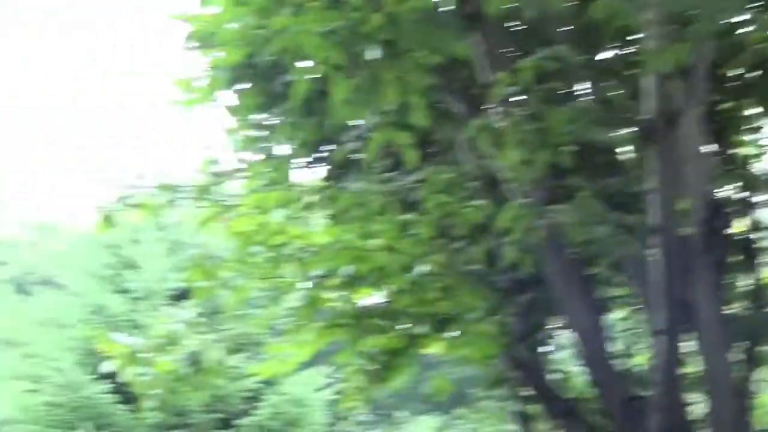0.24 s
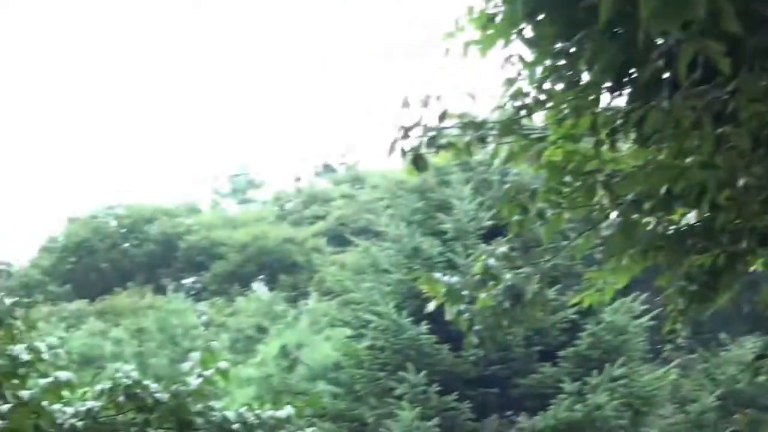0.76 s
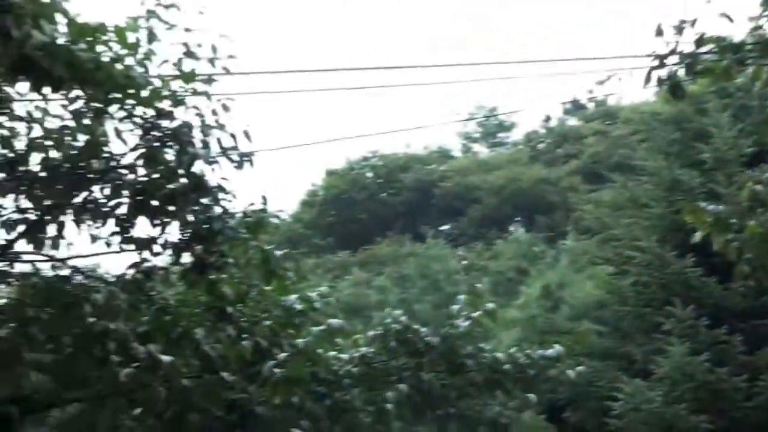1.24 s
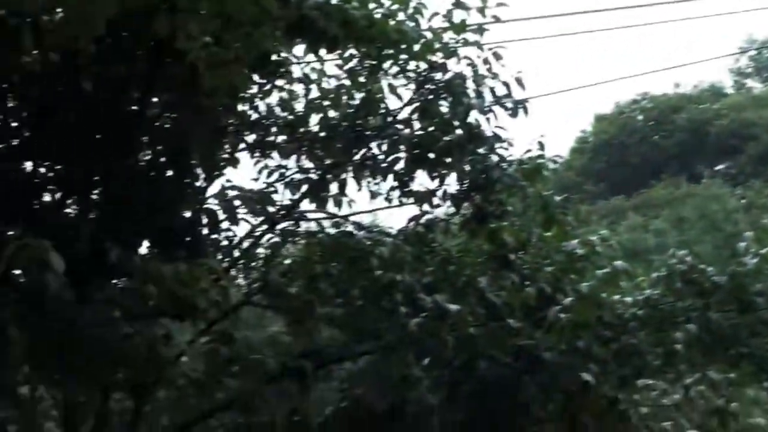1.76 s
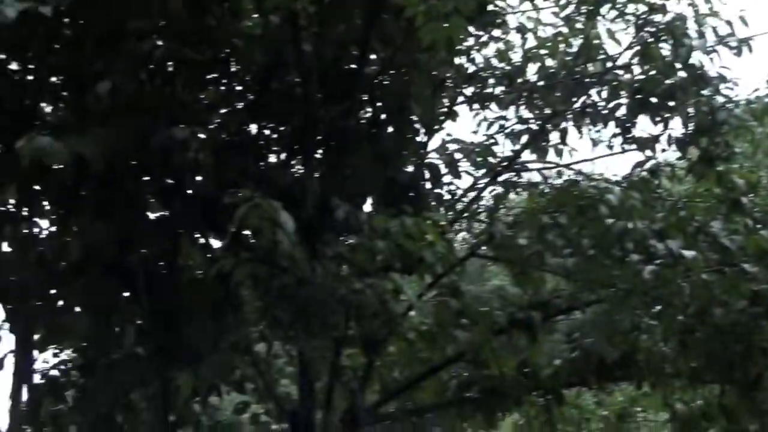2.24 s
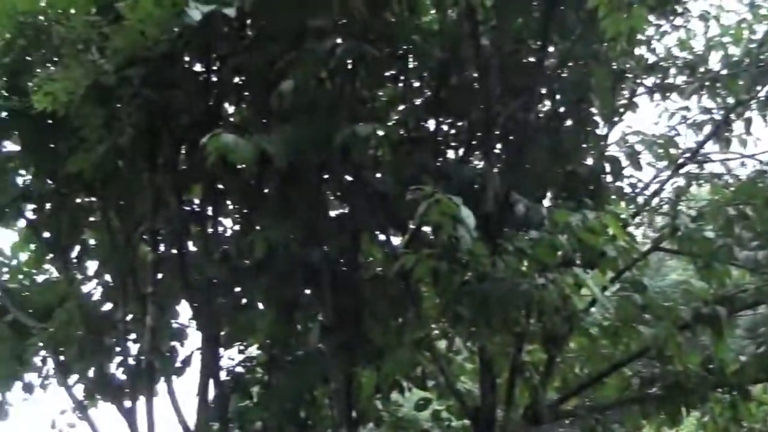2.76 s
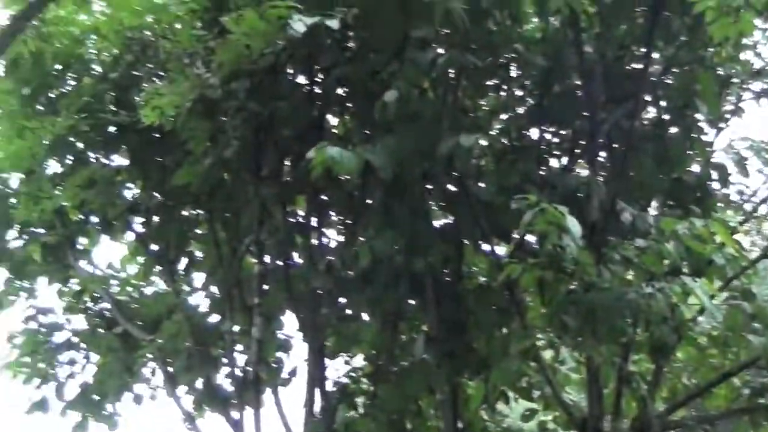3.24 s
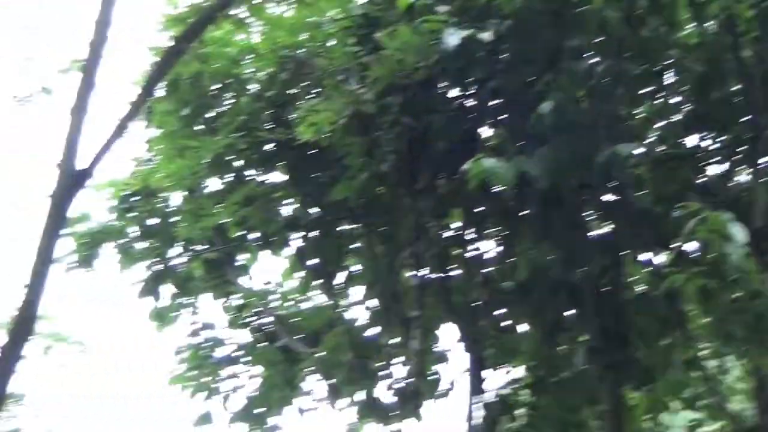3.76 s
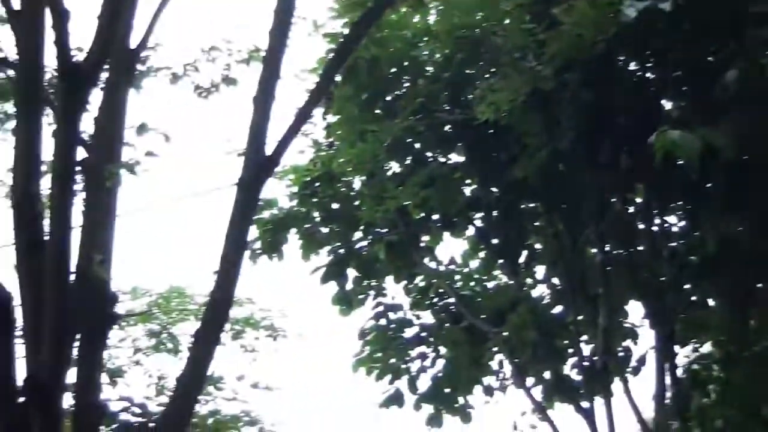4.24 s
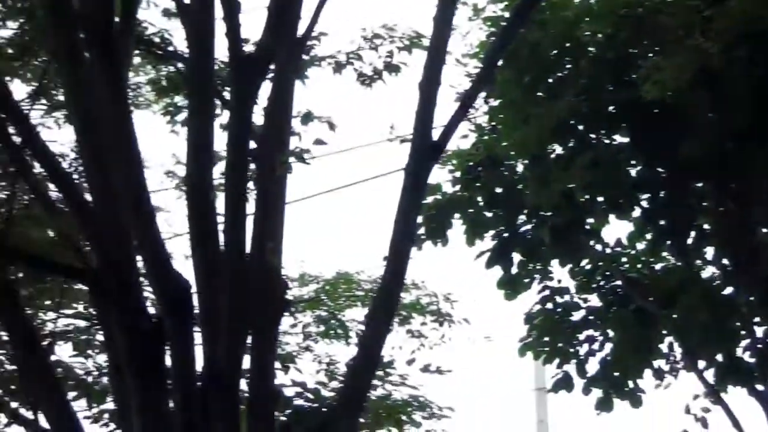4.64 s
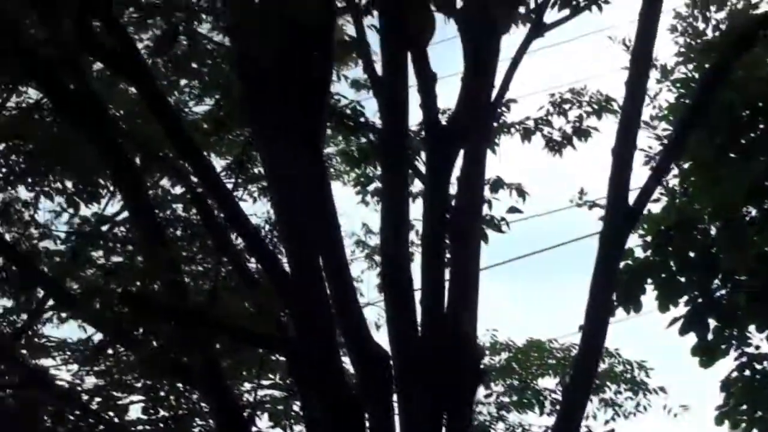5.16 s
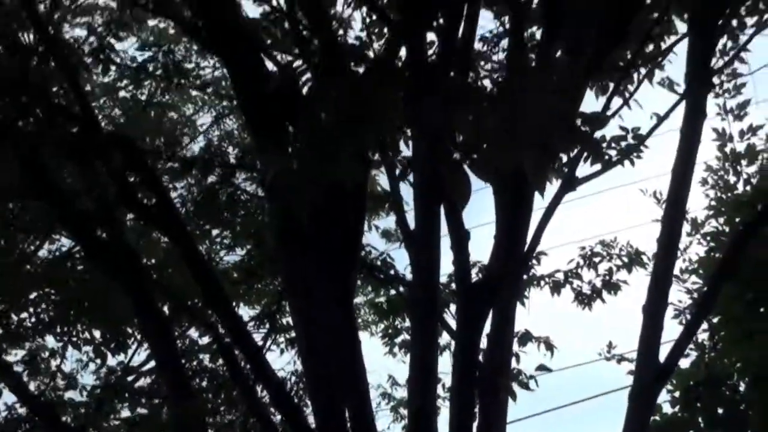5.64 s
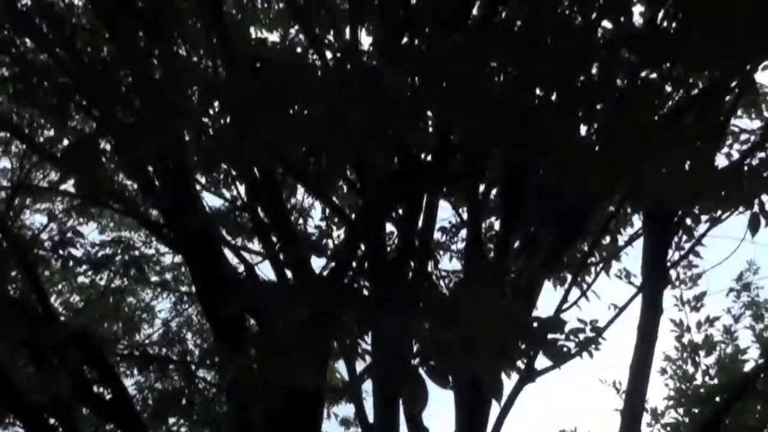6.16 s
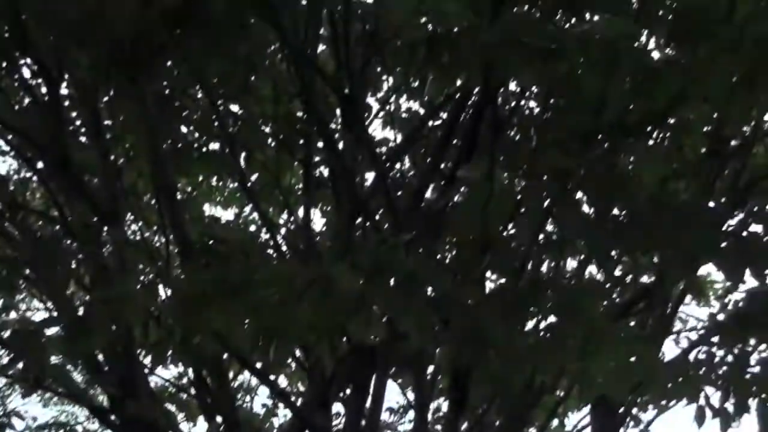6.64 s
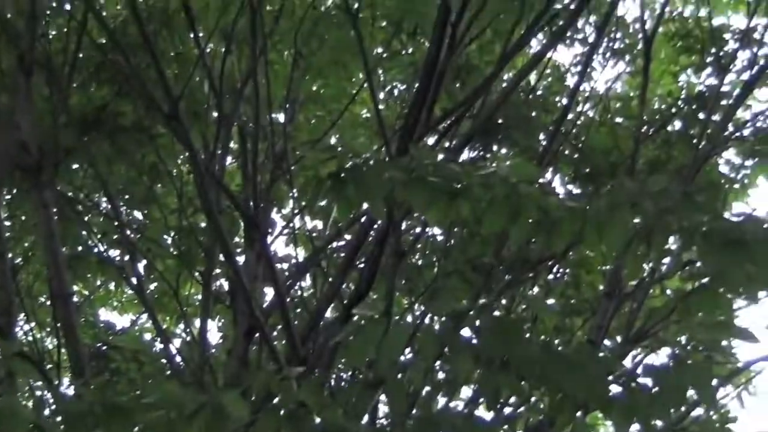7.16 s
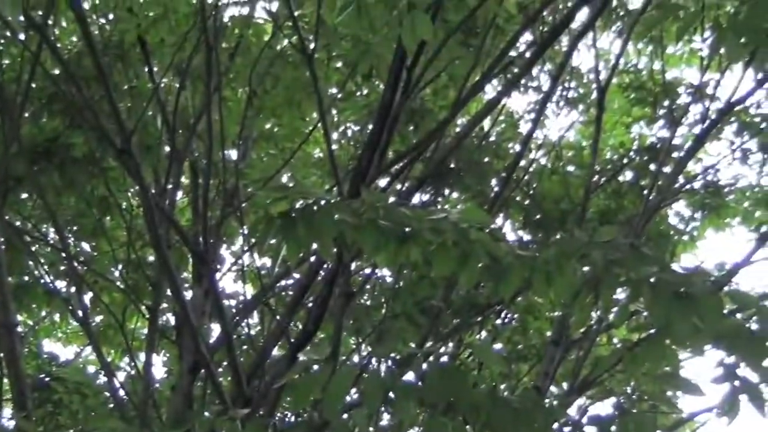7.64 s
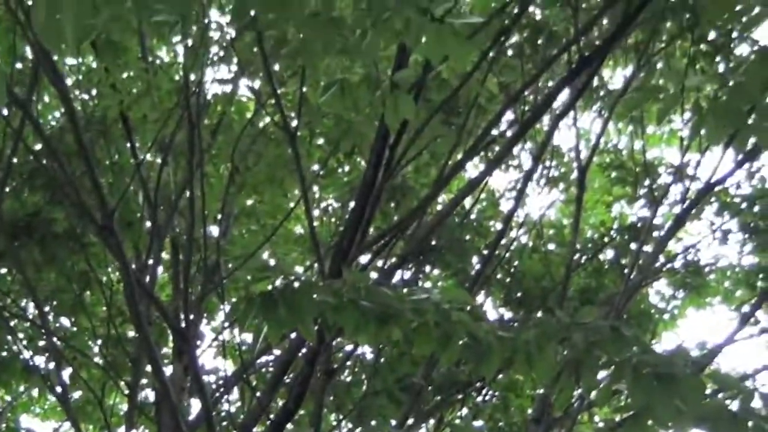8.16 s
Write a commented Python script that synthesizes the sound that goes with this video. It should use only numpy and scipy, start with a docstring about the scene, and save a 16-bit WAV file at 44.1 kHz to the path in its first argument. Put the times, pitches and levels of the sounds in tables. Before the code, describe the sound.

Several cicadas buzz in quick swelling pulses with a thin high whine between them, in quiet countryside.

```python
"""Cicadas in country trees

Each cicada buckles two tymbals in turn, about 185 strokes a second, and the clicks excite its resonances.
A stretching abdomen gives loud syllables whose resonance arches upward; drawn in, it gives a thin whine.
Leaves scatter the calls. A far chorus, a low outdoor rumble and a few faint hoots lie behind."""
import sys
import numpy as np
from scipy import signal
from scipy.fft import rfft, irfft, next_fast_len
from scipy.io import wavfile

SR = 44100
rng = np.random.default_rng(int(sys.argv[2]) if len(sys.argv) > 2 else 0)


def persist_wave(psi):
    """Save psi, clipped to +-1, as 16-bit WAV."""
    counts = np.round(np.clip(psi, -1, 1) * 32767).astype(np.int16)
    wavfile.write(sys.argv[1], SR, np.atleast_2d(counts).T)


N = 369999
TIME = np.arange(N) / SR

# Responses of the body and of its upper ring: (frequency [Hz], relative gain [dB])
BODY_RESPONSE = [(1500, -60), (2300, -64), (3100, -6.5), (3900, 4.5), (4700, 11), (5200, 7), (5600, -18),
                 (6600, -3), (7400, -7.5), (8200, -16), (9500, -23.5), (12000, -34), (16000, -41)]
UPPER_RESPONSE = [(4800, -59.5), (5700, -6), (6200, 5.5), (6800, 8.5), (7250, -4.5), (7900, -15),
                  (9500, -37)]
# Stretches of the abdomen: (onset [s], duration [s], level [dB], first and last stroke rate [Hz],
# start and top of the climbing resonance [Hz], steady resonance [Hz], its share [dB],
# upper ring share [dB], blur by foliage [dB], left-right balance [dB], change of the whine [dB])
STRETCHES = [ (.08, .21, -22, 189.4, 188.4, 4400, 4955, 3900, -6, -0.5, -0.5, 2.5, -4.5),
             (.551, .22, -21.5, 186.3, 187.8, 4260, 5350, 4000, 1.5, 2, 4, 2.5, -8.5),
             (1.0, 0.22, -21, 186, 179.6, 4500, 4770, 4390, -1, -6, 4, 2.5, -9),
             (1.15, 0.27, -28.5, 182, 176.9, 4240, 4200, 4070, 3, -1, 1, 3, 3),
             (1.44, 0.32, -26, 177, 168.2, 4030, 4160, 3500, -0.5, -0.5, -2, 3.5, -3),
             (1.76, 0.27, -28.5, 169, 160, 4310, 4400, 3630, -5, -10, -0.5, 6, -6),
             (2.26, 0.18, -26.5, 186.3, 179, 4290, 4510, 4330, -10, -20, 11, 2, -12),
             (2.75, .16, -24.5, 185.2, 185.2, 4470, 4660, 4100, 2, 0, 3.5, 3, -13),
             (3.202, 0.25, -23, 187.4, 182.7, 3740, 4720, 3855, -14, -3, 5, .5, -10),
             (3.258, 0.13, -20, 196.3, 196, 4530, 5500, 4030, -19, 0, 3, -2, -3),
             (3.671, 0.22, -23, 188, 186, 4680, 4790, 3670, -11, -6.5, -7.5, 5, -4.5),
             (4.13, 0.21, -25.5, 187, 183.8, 4840, 4615, 3530, -4, -6, -4.5, 4.5, -2.5),
             (4.35, 0.16, -26, 183.5, 177, 3500, 5070, 4400, -8, -10, 4, 0, 0.5),
             (4.49, 0.17, -22.5, 183, 183.2, 4600, 4760, 4280, -2, -9, 3, 0, -2),
             (4.621, 0.2, -26, 188.4, 185.8, 4600, 4840, 3520, 0.5, 2, -7.5, 3, -2),
             (4.871, 0.18, -22.5, 181.6, 178.3, 4230, 4930, 3820, -19, -2, 8.5, 1, 0.5),
             (5.01, .17, -23, 184.2, 186.6, 4500, 4600, 4200, 4, -3, 4, 2, -3),
             (5.369, 0.21, -20.5, 181.4, 174.6, 4300, 4940, 4440, -17, -9, 1.5, -0.5, -1.5),
             (5.48, 0.21, -22.5, 190, 187.2, 4315, 4460, 3830, -2, -4, -1, 1.5, -3),
             (5.87, 0.2, -22, 183.5, 178.2, 3950, 4940, 4550, -18, -4, 3.5, 0.5, -2),
             (5.969, .2, -22.5, 189, 186.8, 4370, 4670, 3950, -1, -4, 3.5, -1, -3.5),
             (6.348, 0.206, -21.5, 182.4, 178.2, 4200, 4910, 4380, -20, -14, 2.5, 0, -4.5),
             (6.351, 0.16, -25, 185.8, 185.6, 3840, 5120, 3834, 1, -2, -4, 6, 1),
             (6.45, 0.22, -24.5, 188, 185.8, 4370, 4470, 4130, 6, 0, 3.5, 0, -2),
             (6.791, 0.2, -22.5, 187, 183.5, 4070, 4960, 3850, -11, -8.5, 4.5, 2, -1.5),
             (6.929, .2, -23, 188.5, 186.6, 4490, 4830, 4040, -1, -5, -3.5, 2.5, -2.5),
             (7.241, 0.18, -22, 186.4, 182.8, 4060, 4940, 3980, -2.5, -8, 0, 4, -2),
             (7.391, 0.21, -24, 186.2, 186.4, 4170, 4650, 4210, 5.5, 2, -2, 0, -3),
             (7.679, .17, -21, 185.7, 183.9, 3800, 4880, 3940, -6, -8, 2, 3.5, -1.5),
             (7.831, 0.34, -25.5, 183.7, 179.2, 4200, 4220, 3680, -1.5, -6, -3.5, 2.5, -1),
             (8.122, 0.18, -21, 187.3, 184.2, 3970, 5370, 3910, 0.5, -6, 2.5, 2.5, -6),
             (8.239, .16, -23, 185.2, 180.4, 4240, 4440, 3870, 10.5, 4, 6, 1.5, 0.5)]


def syllables(crest=0.71, rise_s=0.029, fall_s=0.056, arch_hz=1.21):
    """Variable resonance: as the abdomen stretches, the buzz swells and one mode climbs in frequency."""
    out = np.zeros((2, N))
    for (onset, length, db, first_hz, last_hz, start_hz, top_hz,
         steady_hz, steady_db, upper_db, blur_db, pan_db, _) in STRETCHES:
        t = np.arange(int(length * SR)) / SR
        stretch = np.sin(np.pi / 2 * np.interp(t / length, [0, crest, 1], [0, 1, .68]))
        rate_hz = np.interp(t, [0, length], [first_hz, last_hz]) + arch_hz * (stretch - stretch.mean())
        rate_hz *= 1 + 0.0011 * drift(t, 45.7)
        # the second tymbal's lag picks which tones stand out; it comes earlier in the highest calls
        lag = .43 if top_hz > 4930 else .478
        blur = amp(blur_db)  # clear tones in the open, broad and raspy deep in the leaves
        clicks = tymbals(rate_hz, jitter_s=5e-6 * blur, lag=lag, second_db=-7 - blur_db / 2)
        slack_hz = 900 * np.exp(-t / 0.027)  # the abdomen starts slack and sounds dull
        climbing = ring(clicks, start_hz + (top_hz - start_hz) * stretch - slack_hz, width_hz=750 * blur)
        steady = ring(clicks, np.full(len(t), steady_hz), width_hz=400 * blur)
        ribs = signal.fftconvolve(clicks, scatter(.014)[:512])[:len(t)]  # each buckle rattles the ribs
        rasp = amp(blur_db - 2) * unit(colour(ribs, BODY_RESPONSE))
        upper = amp(upper_db - 2.5) * unit(colour(ribs, UPPER_RESPONSE))
        fade = np.clip(t / rise_s, 0, 1) * np.clip((length - t) / fall_s, 0, 1)
        swell = fade * amp(db + 1.1 * (stretch + 0.3))
        call = swell * unit(climbing + amp(steady_db) * steady + rasp + upper)
        mid, side = trees(call, leaves_db=blur_db - 2, wood_db=blur_db - 5.5, leaves_t60=.05, wood_t60=.5)
        add(out, onset, stereo(mid, side, pan=(amp(pan_db) - 1) / (amp(pan_db) + 1)))
    return out


# Three whining cicadas, one list each: (time [s], stroke rate [Hz], prominence [dB])
WHINING_CICADAS = [
    [(0, 187, -15), (.85, 184.9, 10), (1.2, 180, 10), (1.8, 167.2, -5), (2.0, 176.7, 0), (2.5, 180.2, 22),
     (3.4, 185.3, 0), (3.9, 183.6, -4.5), (4.4, 185.1, 1), (4.8, 184.5, -3), (5.5, 187.8, -1.5),
     (6.7, 184.5, -10), (7.3, 187.8, -7), (7.6, 185.7, -1), (8.39, 184.7, 10)],
    [(3.3, 195.7, -40), (3.42, 198.3, -3.5), (4.3, 194.8, -7.5), (4.8, 198.3, -1), (5.0, 193.1, 2),
     (5.2, 188.3, 2), (6.0, 177.6, -4), (6.4, 169.6, -7), (6.9, 164.2, -12)],
    [(4.7, 185.5, -33), (5.0, 185.5, -9), (5.6, 187, -1), (6.8, 187.5, -15), (7.1, 189.7, 11),
     (7.55, 182.9, 8), (7.8, 183.9, 2), (8.39, 182, 14)],
]
# The whine between syllables, and the gain of its side signal: (time [s], level [dB])
WHINE_LEVEL = [(0, -20), (.94, -20.5), (1.3, -26.5), (2.12, -32.5), (2.3, -23), (2.45, -30), (3.3, -24.5),
               (3.41, -19.5), (4.3, -19.5), (6.7, -19.5), (6.95, -22), (8.39, -24.5)]
WHINE_SIDE_LEVEL = [(0, 4), (1.4, 3), (1.9, -34), (3.5, 0), (4.3, 1), (4.9, -5), (6.5, -4.5), (7.0, 0),
                    (8.39, 2)]
# Responses that shape the whine and the hum: (frequency [Hz], relative gain [dB])
WHINE_RESPONSE = [(6000, -17.5), (8500, -15.5), (9700, -17.5), (10800, -7), (11700, 3.5), (12700, 9),
                  (13600, 7), (14700, 8), (15800, -3.5)]
HUM_RESPONSE = [(1200, -66), (1900, -37), (2300, -7.5), (2750, 1.5), (3150, 4.5), (3700, 6), (4600, -17),
                (6500, 5.5), (7400, -9.5), (9000, -47)]


def whine():
    """Source and filter: with the abdomen drawn in, the clicks ring very high over a soft, raspy hum."""
    buzz, rasp, power = np.zeros((2, N)), np.zeros(N), np.zeros(N)
    for cicada in WHINING_CICADAS:
        rate_hz, db = follow(cicada)
        clicks = tymbals(rate_hz * (1 + .000814 * drift(TIME, 30)), jitter_s=5e-6, lag=.46, second_db=-16.5)
        buzz += trees(clicks * amp(db), leaves_db=7.5, wood_db=10.5, leaves_t60=0.15, wood_t60=0.73)
        rough = tymbals(rate_hz * (1 + .01 * drift(TIME, 13)), jitter_s=6e-5, lag=.38, second_db=-4.5)
        rasp += rough * amp(db)
        power += amp(db) ** 2
    buzz /= np.sqrt(power)
    rasp = trees(rasp / np.sqrt(power), leaves_db=-4, wood_db=2, leaves_t60=0.039, wood_t60=0.47)
    dip_db, hum_gain = abdomen()
    high = amp(follow(WHINE_LEVEL)[0] + dip_db) * unit(colour(buzz, WHINE_RESPONSE))
    high[1] *= amp(follow(WHINE_SIDE_LEVEL)[0])
    hum = hum_gain * unit(colour(buzz + amp(-1) * rasp, HUM_RESPONSE))
    return stereo(*(high + hum))


# The hum between its flares: (time [s], level [dB])
HUM_LEVEL = [(0, -38.5), (3.1, -41), (3.8, -36), (4.4, -40.5), (5.2, -31.5), (6.2, -33.5), (7.0, -38),
             (8.39, -52)]


def abdomen(flare_db=-9.5, opening_s=0.0099, closing_s=0.039):
    """Amplitude modulation: most stretches weaken the whine; the hum flares as each opens and closes."""
    dip_db, hum_power = np.zeros(N), amp(follow(HUM_LEVEL)[0]) ** 2
    for onset, length, db, *_, change_db in STRETCHES:
        dip_db += change_db * hump(onset + 0.47 * length, rise_s=0.056, fall_s=0.12)
        flares = hump(onset, opening_s, opening_s) + hump(onset + 0.99 * length, closing_s, closing_s)
        hum_power += amp(db + flare_db) ** 2 * flares
    return dip_db, np.sqrt(hum_power)


def tymbals(rate_hz, jitter_s, lag, second_db, uneven=0.15):
    """Impulse excitation: two tymbals buckle `lag` of a stroke apart, uneven in timing and strength."""
    phase = np.cumsum(rate_hz) / SR
    strokes = np.arange(int(phase[-1]))[:, None] + np.array([0, lag])
    late, strength = rng.standard_normal((2, 2048, 2))[:, :len(strokes)]
    at = (np.interp(strokes, phase, np.arange(len(phase))) + late * jitter_s * SR).reshape(-1, 1)
    strength = ((1 + uneven * strength) * amp([0, second_db])).reshape(-1, 1)
    near = np.floor(at).astype(int) + np.arange(-7, 9)
    clicks = strength * np.sinc(near - at) * np.sinc((near - at) / 8)  # band-limited impulses
    return unit(np.bincount(near.ravel() % len(phase), clicks.ravel(), len(phase)))


def ring(x, hz, width_hz):
    """Forced resonance: two damped resonators in cascade follow the curve hz; the output has rms 1."""
    phasor = np.exp(2j * np.pi * np.cumsum(hz) / SR)
    pole = np.exp(-np.pi * width_hz / SR)
    for _ in range(2):
        x = 2 * (phasor * signal.lfilter([1 - pole], [1, -pole], x / phasor)).real
    return unit(x)


def trees(x, leaves_db, wood_db, leaves_t60, wood_t60):
    """Multipath propagation: direct sound, quick leaf echoes and the wood's longer tail, as (mid, side)."""
    mid, side = (amp(leaves_db) * scatter(leaves_t60) + amp(wood_db) * scatter(wood_t60) for _ in range(2))
    mid[0] += 1  # direct path
    heard = np.array([signal.fftconvolve(x, path)[:N] for path in (mid, side)])
    return heard * np.linalg.norm(x) / np.linalg.norm(heard, axis=1, keepdims=True)


def scatter(t60):
    """Diffuse scattering: random echoes of energy 1 decay by 60 dB in t60 seconds."""
    t = np.arange(SR // 2) / SR
    echoes = rng.standard_normal(len(t)) * amp(-60 * t / t60)
    return echoes / np.linalg.norm(echoes)


# Swell of the far chorus: (time [s], level [dB])
CHORUS_LEVEL = [(0, -25.5), (.9, -29), (1.9, -24), (2.3, -25), (3.1, -28.5), (3.6, -32), (4.1, -29.5),
                (4.75, -32.5), (5.25, -30.5), (5.8, -37.5), (6.6, -38), (7.2, -29.5), (8.39, -31)]
# Its spectral envelope: (frequency [Hz], relative gain [dB])
CHORUS_RESPONSE = [(1200, -46), (2000, -25.5), (2600, -17), (3200, -5.5), (3800, -2.5), (4550, 2),
                   (5050, -8), (5500, -9), (6500, -9), (7300, -20), (8500, -27), (12000, -11), (16000, -86)]


def chorus(count=6):
    """Incoherent summation: far cicadas blend, each with its own wandering rate, level and echoes."""
    far = np.zeros((2, N))
    for _ in range(count):
        rate_hz = 180 * (1 + .04 * drift(TIME, 1.3))
        buzz = tymbals(rate_hz, jitter_s=4e-5, lag=.46, second_db=-0.5) * amp(2.5 * drift(TIME, 5))
        far += trees(buzz, leaves_db=1.5, wood_db=3.5, leaves_t60=0.06, wood_t60=0.25)
    mid, side = unit(colour(far, CHORUS_RESPONSE)) * amp(follow(CHORUS_LEVEL)[0])
    return stereo(mid, side, pan=0.074)


# Swell of the outdoor air: (time [s], rumble level [dB], rush level [dB])
AIR_LEVELS = [(.3, -54.5, -52), (1.1, -53, -51), (1.55, -51.5, -48), (2.0, -51.5, -49), (3.2, -51, -48.7),
              (3.9, -53, -49.5), (4.8, -53.5, -48), (5.2, -54.5, -51), (5.6, -54.5, -50), (6.5, -55.5, -52),
              (7.2, -54.5, -51), (8.39, -53, -51)]
# Its spectrum before the split into bands: (frequency [Hz], relative level [dB])
AIR_SPECTRUM = [(12, -39), (20, -8), (44, -3.5), (107, -6.5), (201, 1.5), (438, -2.5), (822, -4),
                (1320, -8.5), (1900, -9), (2470, -8.5), (4180, -120)]


def air(deep_hz=120, split_hz=450, waver_db=1.1):
    """Ambient noise in three bands: a steady deep drone, a wavering rumble and a faint rush."""
    noise = colour(rng.standard_normal((2, N)), AIR_SPECTRUM)
    deep, low = (signal.sosfiltfilt(signal.butter(4, hz, fs=SR, output="sos"), noise)
                 for hz in (deep_hz, split_hz))
    rumble_db, rush_db = follow(AIR_LEVELS)
    drone = amp(-62.5) * unit(deep)
    rumble = amp(rumble_db + waver_db * drift(TIME, 6) - 0.23) * unit(low - deep)
    rush = amp(rush_db + 0.73) * unit(noise - low)
    return stereo(*(drone + rumble + rush))


# Distant tones: (onset [s], duration [s], frequency [Hz], resonator bandwidth [Hz], level [dB])
FAR_TONES = [(.56, 0.45, 627, 80, -52.5), (3.948, 0.53, 765, 450, -49.5), (4.598, 0.37, 939, 401.6, -52)]


def hoots():
    """Narrow-band noise: a resonance gives it the blurred pitch of a faint, far tone."""
    out = np.zeros((2, N))
    for onset, length, hz, width_hz, db in FAR_TONES:
        size = int(length * SR)
        mid, side = (ring(rng.standard_normal(N)[:size], np.full(size, hz), width_hz) for _ in range(2))
        add(out, onset, amp(db) * stereo(mid, side) * signal.windows.tukey(size, .5))
    return out


# Stereo width across the spectrum: (frequency [Hz], side gain [dB])
SIDE_RESPONSE = [(30, -38), (120, -33), (250, -18.5), (600, -10.5), (1300, -6), (2050, -31), (2700, -11),
                 (4700, -9), (6700, -9), (8000, -28), (9200, -19), (10400, -2), (11800, -21), (15000, -34)]


def stereo(mid, side, pan=0):
    """Mid-side stereophony: the filtered side gives width; a positive pan shifts the image left."""
    return np.array([mid, colour(side, SIDE_RESPONSE) + pan * mid])


def colour(x, response):
    """Zero-phase filtering by (frequency [Hz], gain [dB]) points."""
    size = next_fast_len(x.shape[-1] + 2048)
    hz, db = np.transpose(response)
    gain = amp(np.interp(np.log(np.fft.rfftfreq(size, 1 / SR) + 1), np.log(hz + 1), db))
    return irfft(rfft(x, size) * gain, size)[..., :x.shape[-1]]


def amp(db):
    """Decibels to amplitude ratio."""
    return 10 ** (np.asarray(db) / 20)


def unit(x):
    """Normalisation to rms 1."""
    return x / np.sqrt(np.mean(x ** 2) + 1e-20)


def follow(rows):
    """Linear interpolation of a table's columns over time."""
    times, *columns = np.transpose(rows)
    return [np.interp(TIME, times, column) for column in columns]


def drift(t, per_s):
    """Random modulation through per_s Gaussian values a second."""
    knots = rng.standard_normal(1024)
    return np.interp(t * per_s, np.arange(len(knots)), knots)


def hump(peak_s, rise_s, fall_s):
    """A two-sided Gaussian envelope of height 1."""
    return np.exp(-((TIME - peak_s) / np.where(TIME < peak_s, rise_s, fall_s)) ** 2)


def add(mix, onset_s, sound):
    """Superposition of a delayed sound on the mix."""
    part = mix[:, max(round(onset_s * SR), 0):][:, :sound.shape[1]]
    part += sound[:, :part.shape[1]]


def scene():
    """Superposition of all sources, as (left, right); bodies as small as a cicada's radiate no bass."""
    small_body = signal.butter(6, 1800, "highpass", fs=SR, output="sos")
    cicadas = signal.sosfilt(small_body, syllables() + whine() + chorus())
    mid, side = cicadas + air() + hoots()
    return np.array([mid + side, mid - side])


def record(dry):
    """Band limiting: a linear-phase low-pass removes the highest treble."""
    lowpass = signal.firwin(601, cutoff=15900, window=("kaiser", 8), fs=SR)
    return signal.oaconvolve(dry, lowpass[None], "same")


dry = scene()
out = record(dry)
persist_wave(out)
```